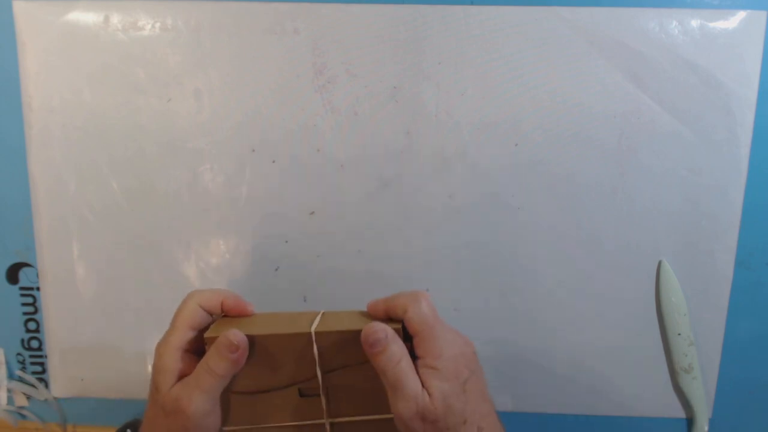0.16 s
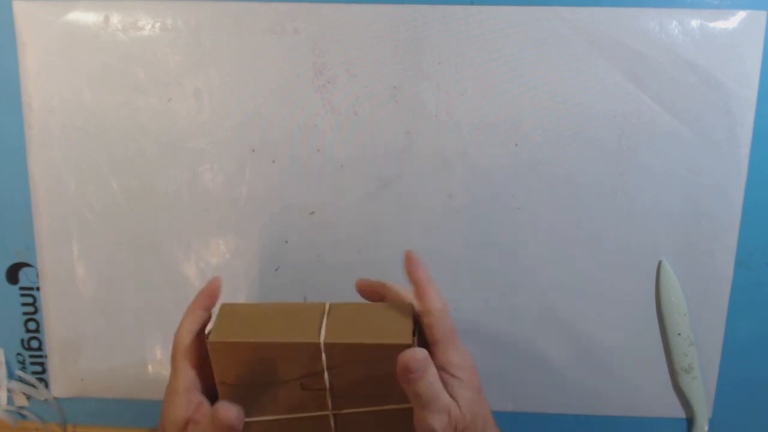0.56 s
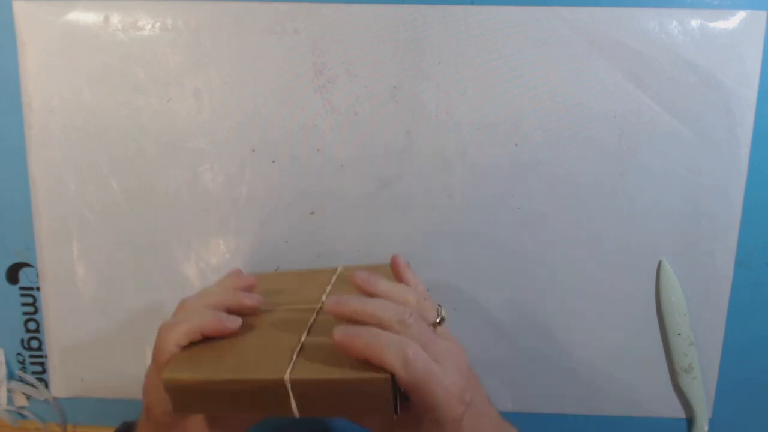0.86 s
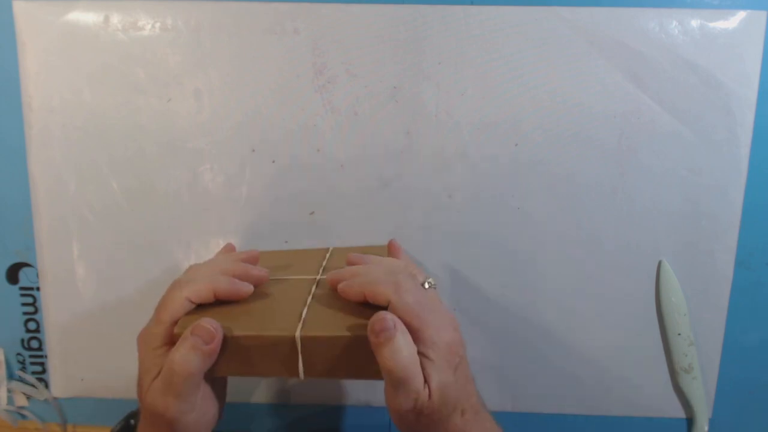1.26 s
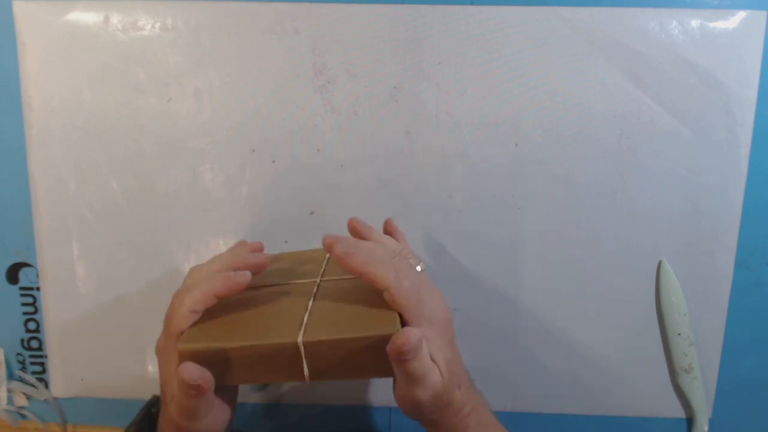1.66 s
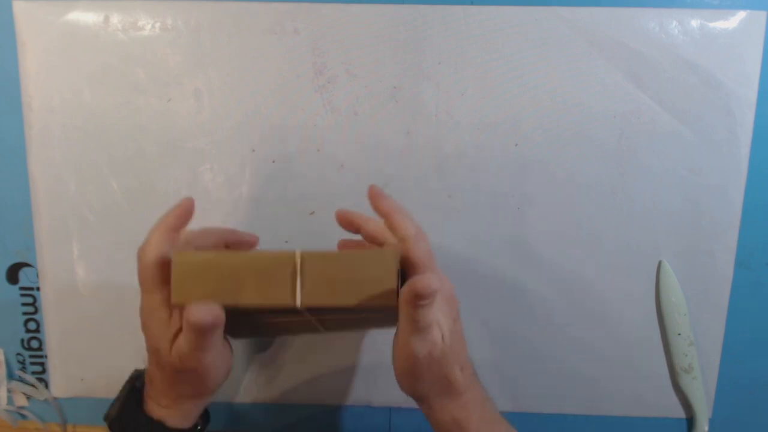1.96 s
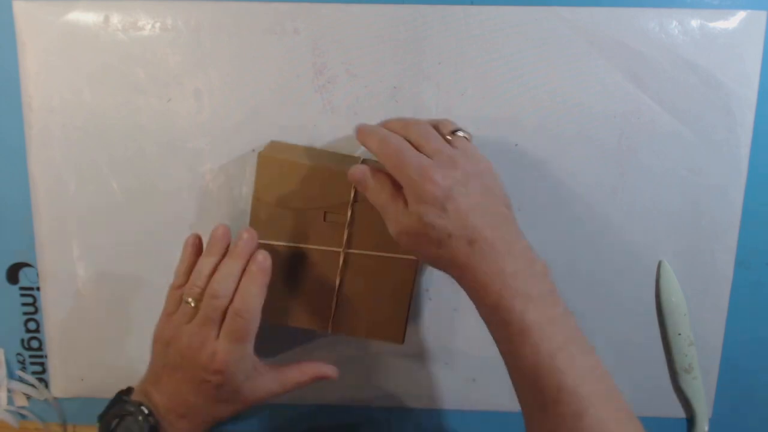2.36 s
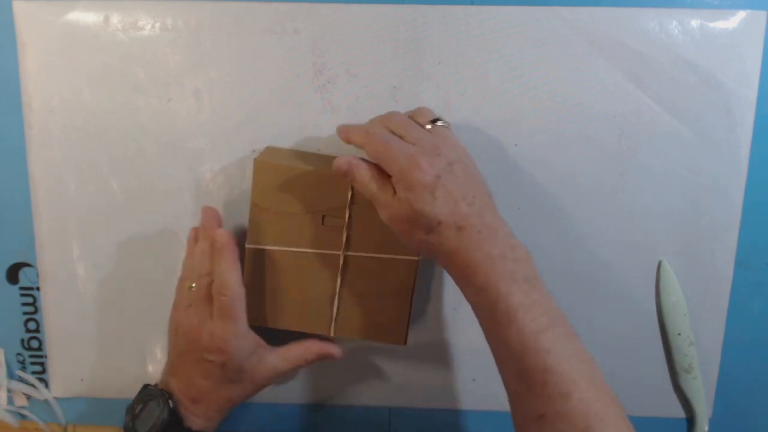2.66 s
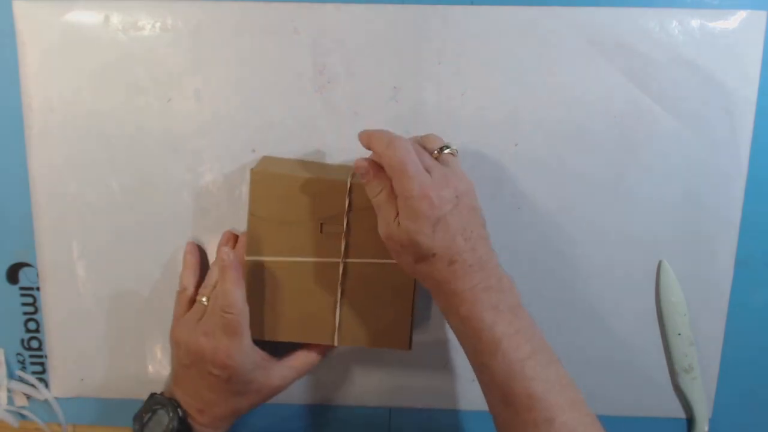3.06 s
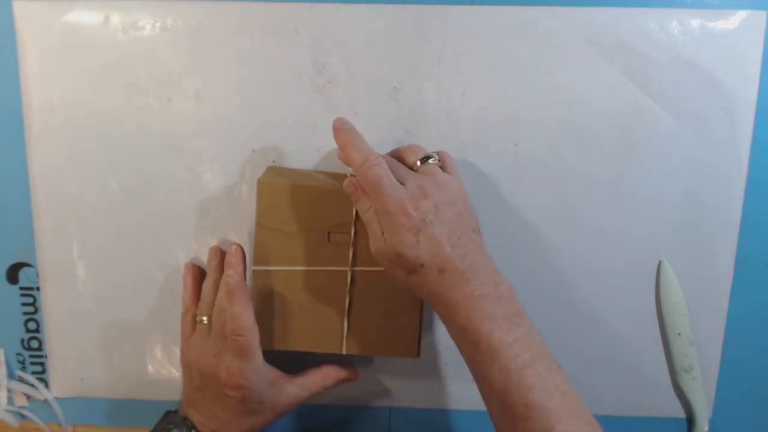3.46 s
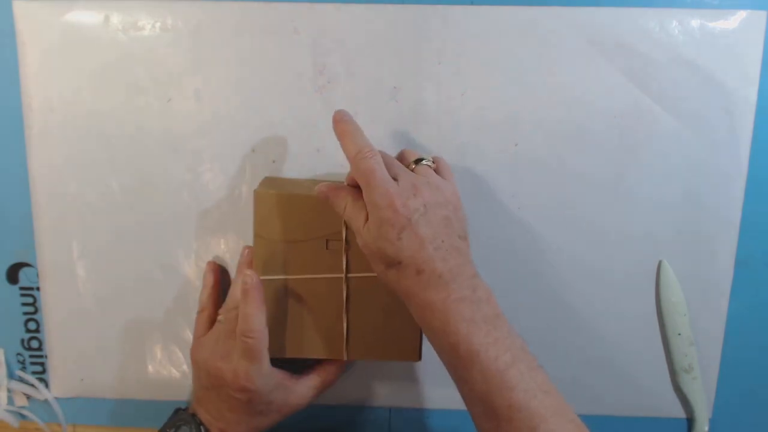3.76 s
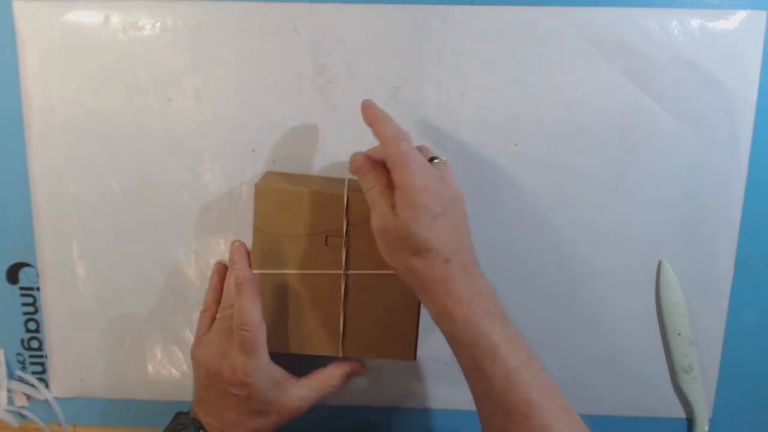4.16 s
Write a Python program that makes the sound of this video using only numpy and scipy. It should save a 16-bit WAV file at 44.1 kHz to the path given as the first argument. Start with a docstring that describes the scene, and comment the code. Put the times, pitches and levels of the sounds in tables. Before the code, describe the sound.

Fingers slide, click and tap on a small cardboard box as it is turned over. The box meets the table with a hollow knock, is rubbed some more, and lands again with a quick double knock. Then a stretched rubber band snaps against the lid four times, the first and last loudest, with cardboard clicks and scuffs between. The microphone is close in a small, dry room.

```python
"""A folded cardboard box is turned over, set down on a table and snapped with its rubber bands.
Flaps click, and fingers slide, rub and tap on the panels, making them hiss and hum.
The box lands with a few knocks; then a stretched band slaps the lid and sets it ringing.
The room is small and dry. A close microphone cuts the top treble and overloads on the hardest blows."""
import sys
import numpy as np
from scipy import signal
from scipy.fft import rfft, irfft, next_fast_len
from scipy.io import wavfile
from scipy.ndimage import uniform_filter1d, minimum_filter1d, map_coordinates

SR = 44100
rng = np.random.default_rng(int(sys.argv[2]) if len(sys.argv) > 2 else 0)


def unload_wav(signal):
    """Save mono or channel-first audio to the path in sys.argv[1] as 16-bit WAV at rate SR, clipped to [-1, 1]."""
    wavfile.write(
        sys.argv[1],
        SR,
        np.round(np.clip(np.atleast_2d(signal).T, -1, 1) * 32767).astype(np.int16),
    )


N = 190335
LENGTH, LEAD = 16384, 1024  # samples in one short sound, and in the scrape that leads into a blow
T = np.arange(LENGTH) / SR
HZ = np.fft.rfftfreq(LENGTH, 1 / SR)

# Flaps click. Each row: time in seconds, level in dB, tilt toward treble in dB per octave, thump in dB,
# pitch of the struck spot in Hz, build-up in seconds, ringing in dB.
FLAP_CLICKS = [(.057, -23, -0.5, -4, 2300, .0004, -9.5), (.077, -24, 3.5, -14.5, 7000, .0003, -24.5),
               (.699, -36, -4, -36, 3020, 0.00029, -1), (.81, -24.5, -4.5, -32, 3100, 0.001, -15.5),
               (.926, -40, 1.5, -40, 570, 0.00067, 2.5), (1.926, -23, 4.5, -35, 2570, 0.00066, -7),
               (2.084, -33.5, -2.5, 4, 1400, 0.0023, -25.5), (2.244, -24.5, -1, -49, 3740, 0.00026, -10.5),
               (2.806, -26.5, -5.5, -44, 1350, 0.0066, -22), (3.368, -25.5, 4.5, -18, 2040, 0.00022, -16),
               (3.376, -19.5, 0, -18, 694, 0.00063, -39), (3.559, -18, -5.5, -47, 2720, 0.00015, -2.5),
               (3.606, -27.5, -0.5, -21.5, 398, 0.001, -23), (3.78, -29.5, 1.5, -20.5, 620, 0.0019, -1.5),
               (3.923, -12.5, -1.5, -32.5, 620, 0.0013, -19), (4.003, -27, -1, -10.5, 1034, 0.0021, -7)]
# The box lands. Each row: as for a click, then chatter fade time in seconds, lead-in scrape in dB.
BOX_KNOCKS = [(1.142, -13, -1.5, -0.5, 490, 0.0013, -3, 0.064, -18),
              (2.072, -36, -6, 4.5, 560, 0.0045, -8, .04, -32),
              (2.321, -15, -1.2, -4, 840, 0.0018, -6.5, 0.11, -32.5),
              (2.331, -18, 2.5, -1.5, 1150, 0.0013, -8.5, 0.061, -26.5),
              (2.424, -39.5, -10.5, 4, 950, 0.0099, -21, 0.084, -2)]
# The band slaps the lid. Each row: as for a knock.
BAND_SNAPS = [(3.2, -8, -0.77, -6, 1314, 0.0012, -15, 0.028, -29.5),
              (3.438, -20.5, 1.46, -5.5, 512, .0003, -11, .018, -18.5),
              (3.825, -24, 2.9, -7, 1770, .0008, -10.5, 0.013, -27.5),
              (4.152, -7.5, 0.06, -0.5, 1404, 0.00079, -15.5, .027, -46)]
# Skin slides on card, and the rubber band fizzes briefly after two of its snaps.
# Each row: loudest moment in seconds, length in seconds, level in dB, brightness in dB.
SLIDE_STROKES = [(0.058, 0.16, -24.5, -1), (0.175, 0.16, -32, 8), (0.265, 0.074, -34.5, -3),
                 (0.377, 0.074, -21.5, 5), (.515, 0.14, -37.5, -3), (0.639, 0.042, -28, -10.5),
                 (0.712, 0.092, -40.5, -7), (0.815, 0.07, -31.5, -6.5), (1.291, 0.056, -34.5, -7.5),
                 (1.451, 0.046, -52, 3), (1.578, .08, -46, -10), (1.763, 0.09, -50, 25.5),
                 (1.813, 0.055, -32.5, 6), (1.869, 0.16, -44.5, -2), (1.952, 0.044, -50.5, 22.5),
                 (2.078, 0.055, -30, 2.5), (2.134, 0.17, -61, 18), (2.63, 0.16, -52, -14.5),
                 (2.917, 0.03, -30, -19), (3.005, 0.15, -30.5, -19), (3.305, 0.093, -35, 3),
                 (3.407, 0.073, -34.5, 6), (3.459, 0.073, -46, 32), (3.535, 0.064, -34, -1),
                 (3.618, 0.029, -26.5, 2), (3.784, 0.15, -36.5, -2.5), (3.86, 0.046, -58, 16.5),
                 (4.004, 0.046, -26.5, 6)]
# A finger drags and a panel hums. Each row: loudest moment in seconds, level in dB, pitch in Hz.
FINGER_RUBS = [(.436, -33, 585), (.6, -39.5, 554), (0.982, -41, 646), (1.292, -36, 370), (1.389, -48, 388),
               (1.568, -43.5, 898), (1.642, -44.5, 432), (1.737, -38, 383), (1.817, -28.5, 385),
               (1.943, -31, 839), (2.131, -38.5, 564), (2.67, -45, 452), (2.92, -42, 396),
               (3.026, -39.5, 730), (3.061, -45.5, 391), (3.351, -33.5, 728), (3.54, -34, 600),
               (3.758, -33, 743), (4.238, -33.5, 746), (4.295, -42.5, 393)]
# Fingertips drum on a panel. Each row: start in seconds, level in dB, pitch in Hz.
FINGER_TAPS = [(.556, -6.5, 585), (.626, -19.5, 633), (.636, -23.5, 599), (1.594, -26.5, 572),
               (2.695, -17.5, 610), (2.707, -24, 404), (2.805, -18, 741), (2.975, -23.5, 427),
               (3.311, -27, 497), (3.902, -27.5, 397), (3.955, -21, 566), (3.981, -22, 390)]

# Modes (natural ringing tones) of the lid and of the whole box on the table.
# Each row: pitch in Hz, level in dB, longest allowed fade time in seconds.
LID_MODES = [(368.2, -3.5, 0.33), (497, -12.5, 0.043), (759, 4, 0.076), (865, 3, 0.043), (1307, 2.5, 0.052),
             (1550, -12, 0.2), (1934, -8.5, 0.071), (2040, -5, 0.081), (2390, -5.5, 0.23),
             (3000, -3.5, 0.043), (3270, -7, 0.33), (3930, -14.5, 0.18), (4410, -4, 0.33), (5150, -5, 0.12)]
BOX_MODES = [(114, -11.5, 0.15), (138.2, -10.5, 0.27), (164.6, -1.5, 0.27), (185, -5.5, 0.17),
             (263, -5.5, 0.14), (400.4, 8, .1), (553, 1, 0.15), (650, -6, 0.058), (854, 0.5, 0.084),
             (1000, -18.5, 0.076), (1320, -7, 0.09), (1311, -5, 0.11), (1746, -10, .08)]
# Modes of a tapped panel. Each row: multiple of its pitch, level in dB.
PANEL_MODES = [(1, 7.5), (.72, -21), (1.18, -3), (1.7, -7.5)]
# The edges, in Hz, of the five frequency ranges of a blow. The lowest range is the thump.
RANGE_EDGES_HZ = [90, 300, 650, 1100, 3000, 8000]
# The tone of each kind of blow above its thump. Each row: frequency in Hz, level in dB.
CLICK_COLOUR = [(440, -4.5), (850, -1.5), (1800, 1.5), (4900, -2)]
KNOCK_COLOUR = [(440, 3.5), (850, -3.5), (1800, -5), (4900, -14)]
SNAP_COLOUR = [(440, 1), (850, -4.5), (1800, 0.5), (4900, -2)]
# How well the box passes sound to the air, with a dip between its air resonance and lowest panel mode.
# Each row: frequency in Hz, gain in dB.
BOX_RESPONSE = [(90, 2.5), (155, 2.5), (280, -1.5), (390, 1), (500, 2.5), (730, 3), (1000, 1), (1300, 3.5),
                (1950, 3), (2700, 4), (4500, -2), (6800, -7), (8000, -14.5)]
# The light band mostly wakes the lid's upper modes. Each row: frequency in Hz, gain in dB.
SLAP_BOOST = [(400, -6.5), (800, 3), (1250, 9.5), (4500, 11.5)]
# Three layers of sliding noise, a fingertip's tick and the room's hush.
# Each row: frequency in Hz, level in dB.
MURMUR_COLOUR = [(80, -25), (250, -15.5), (380, 1), (560, 8), (800, -4), (1300, -8.5), (2500, -20),
                 (5000, -49)]
RASP_COLOUR = [(400, -20), (900, 6), (1400, 6), (2600, 8.5), (3400, 1.5), (6000, -37)]
HISS_COLOUR = [(1200, -33.5), (2800, 0.5), (3600, 0.5), (5000, -1), (6500, -2.5), (8000, -16.5)]
TICK_COLOUR = [(150, -31), (700, -19.5), (1400, 9.5), (2800, 15), (7000, -9), (10000, -77)]
HUSH_COLOUR = [(25, -27.5), (100, 2), (250, 1), (500, -0.5), (1000, 0), (3000, -10.5), (8000, -15.5)]
# How long the room echoes. Each row: frequency in Hz, fade time in seconds.
ECHO_FADE = [(150, 0.15), (700, 0.14), (2000, 0.14), (7000, 0.15)]
# How loud the room echoes. Each row: frequency in Hz, level in dB.
ECHO_LEVEL = [(100, -25.5), (350, -16.5), (700, -10), (2000, -10), (7000, -13.5)]
# How much the table's reflections differ from left to right. Each row: frequency in Hz, gain in dB.
STEREO_SPREAD = [(130, 12), (500, 9), (1200, 4), (3000, 0)]


def amp(db):
    """Turn decibels into a gain."""
    return 10 ** (np.asarray(db) / 20)


def unit(x):
    """Scale to an average power of 1."""
    return x / np.sqrt(np.mean(x ** 2) + 1e-20)


def norm(x):
    """Scale to a total energy of 1."""
    return x / np.linalg.norm(x)


def fade(t, t60):
    """Die away by 60 dB in t60 seconds, the fade time."""
    return np.exp(-np.log(1000) * t / np.maximum(t60, 1e-3))


def along(points, hz):
    """Read between the rows of a frequency table, on a scale of octaves."""
    freqs, values = np.transpose(points)
    return np.interp(np.log(hz + 1), np.log(freqs + 1), values)


def wobble(rate):
    """A smooth curve through `rate` random values a second."""
    return map_coordinates(rng.standard_normal(int(N * rate / SR) + 4), [np.arange(N) * rate / SR])


def filtered(x, response):
    """Give each frequency of x the gain that `response` returns."""
    size = next_fast_len(N + 8192)
    return irfft(rfft(x, size) * response(np.fft.rfftfreq(size, 1 / SR)), size)[..., :N]


def coloured(x, colour):
    """Shape noise with a colour table, at an average power of 1."""
    return unit(filtered(x, lambda hz: amp(along(colour, hz))))


def causal(points):
    """Turn a table of Hz and dB into a filter that never rings before it is hit (minimum phase)."""
    cepstrum = irfft(np.log(np.maximum(amp(along(points, HZ)), 1e-6)))
    cepstrum[1:LENGTH // 2] *= 2
    cepstrum[LENGTH // 2 + 1:] = 0
    return np.exp(rfft(cepstrum))


def add(track, s, sound):
    """Mix a sound in at s seconds."""
    part = track[round(s * SR):][:len(sound)]
    part += sound[:len(part)]


def swell(s, rise, fall):
    """A loudness curve that peaks at s and is 20 dB down `rise` seconds before and `fall` after."""
    t = np.arange(N) / SR - s
    width = np.where(t < 0, rise, fall)
    return 10 ** -np.minimum(abs(t / width) ** 1.236, 20)


def in_room(sound, delay_s=.004):
    """Add the room's short echo, slightly different for every hit."""
    hz, t, noise = signal.stft(rng.standard_normal(LENGTH), SR, nperseg=256)
    dying = noise * fade(t, along(ECHO_FADE, hz)[:, None])
    tail = norm(signal.istft(dying, SR, nperseg=256)[1])
    echo = irfft(rfft(sound) * rfft(tail[:LENGTH]) * causal(ECHO_LEVEL))
    return sound + np.pad(echo, (round(delay_s * SR), 0))[:LENGTH]


def ringing(modes, t, drift=0.0065, crowd_t60=.16):
    """Card rings only briefly: its low modes waver, and its high ones crowd into a dry rasp."""
    tones = np.zeros(LENGTH)
    for hz, db, t60 in modes:
        gain = amp(db + rng.normal(0, 4.2))
        longest = min(.22, .16 * (1000 / hz) ** .2)
        phase = 2 * np.pi * hz * t + np.cumsum(rng.normal(0, drift, LENGTH))
        tones += gain * fade(t, min(t60, longest)) * np.sin(phase)
    treble = signal.butter(2, 1500, "high", fs=SR, output="sos")
    crowd = signal.sosfilt(treble, rng.standard_normal(LENGTH)) * fade(t, crowd_t60)
    onset = 1 - fade(t, 0.0088)
    return norm(norm(tones * onset) + norm(crowd * onset))


def blow(modes, build_s, chatter_t60, scrape_db, ring_db, push_db, bass_hz):
    """The spectrum of one hit: a scrape builds to a push and a burst of chatter, and the card rings on."""
    t = T - LEAD / SR
    after, before = np.maximum(t, 0), np.maximum(-t, 0)
    chatter = fade(after, chatter_t60) * np.exp(-before / build_s)
    scrape = (t < 0) * amp(scrape_db) * fade(before, 0.025)
    contact = norm(rng.standard_normal(LENGTH) * (chatter + scrape))
    push = (t >= 0) * np.exp(-after / 0.00027)  # card gives way, so the push is a short bump
    contact += amp(push_db) * push / push.sum()
    spectrum = rfft(contact + amp(ring_db) * ringing(modes, after))
    # small panels give off little bass
    bass_cut = (1j * HZ) ** 2 / (bass_hz ** 2 - HZ ** 2 + np.sqrt(2) * 1j * HZ * bass_hz)
    return spectrum * bass_cut * causal(BOX_RESPONSE)


def at_spot(sound, hz, boost_db=5, sharpness=5.1):
    """The stiffness of the card where it is struck lifts one pitch; the energy stays the same."""
    peak = signal.lfilter(*signal.iirpeak(hz, sharpness, fs=SR), sound)
    return norm(sound + amp(boost_db) * peak) * np.linalg.norm(sound)


def blows(table, colour, modes, gain_db, ringing_db, push_db, bass_hz):
    """Play a table of hits, each with its own loudness, brightness, thump and ring."""
    track = np.zeros(N)
    edges = np.array(RANGE_EDGES_HZ)
    centres = np.sqrt(edges[1:] * edges[:-1])
    ranges = [(HZ >= low) & (HZ < high) for low, high in zip(edges, edges[1:])]
    for s, db, tilt, thump_db, spot_hz, build_s, ring_db, chatter_t60, scrape_db in table:
        spectrum = blow(modes, build_s, chatter_t60, scrape_db, ring_db + ringing_db, push_db, bass_hz)
        # steer each frequency range toward its wanted level
        upper_db = along(colour, centres[1:]) + tilt * np.log2(centres[1:] / 1000)
        wanted_db = gain_db + db + np.r_[thump_db, upper_db]
        energy = np.array([np.sum(abs(spectrum[part]) ** 2) for part in ranges]) * 2 / LENGTH
        sound = irfft(spectrum * causal(np.c_[centres, wanted_db - 10 * np.log10(energy)]))
        add(track, s - LEAD / SR, in_room(at_spot(sound, spot_hz)))
    return track


def flap_clicks(chatter_t60=0.025, scrape_db=-19.5):
    """Flaps and edges catch and let go, making the lid ring."""
    rows = [(*row, chatter_t60, scrape_db) for row in FLAP_CLICKS]
    return blows(rows, CLICK_COLOUR, LID_MODES, gain_db=22.5, ringing_db=-7.5, push_db=-2, bass_hz=270)


def strokes(bright_share, grip_db=-73, restless_db=4, rise_share=.34):
    """Loudness of one sliding layer: it swells with each stroke, over a faint, shifting grip."""
    grip = amp(grip_db - 5 * bright_share + restless_db * wobble(25))
    return grip + sum(
        amp(db + bright_share * bright_db) * swell(s, rise_share * length, (1 - rise_share) * length)
        for s, length, db, bright_db in SLIDE_STROKES)


def through_lid(x, boost_db=3, sharpness=30):
    """The lid's modes stand out of whatever rubs on it."""
    def response(f):
        peaks = 0
        for hz, db, _ in LID_MODES:
            damping = 1j * f * hz / sharpness
            peaks += amp(db) * damping / (hz ** 2 - f ** 2 + damping)
        return 1 + amp(boost_db) * peaks
    return filtered(x, response)


def slides(murmur_db=-3, rasp_db=-8.5, hiss_db=-16, grain_db=3, slip_db=2):
    """Skin or rubber sticks and slips on the paper: a fine hiss and rasp, and a murmur in the panels."""
    murmur = amp(murmur_db) * strokes(bright_share=0)
    rasp = amp(rasp_db) * strokes(bright_share=.65)
    hiss = amp(hiss_db) * strokes(bright_share=1)
    slips = amp(slip_db * wobble(120))

    def friction(colour):
        grainy = rng.standard_normal(N) * slips * amp(grain_db * wobble(1200))
        return coloured(through_lid(grainy), colour)
    return murmur * friction(MURMUR_COLOUR) + rasp * friction(RASP_COLOUR) + hiss * friction(HISS_COLOUR)


def finger_rubs(rise_s=0.026, fall_s=0.039, width_hz=170, gain_db=-1):
    """Uneven slipping keeps one panel mode going for a moment: a hollow, rough hum."""
    t = np.arange(N) / SR
    real, imaginary = (unit(wobble(width_hz) + .5 * wobble(3 * width_hz)) for _ in range(2))
    slipping = real + 1j * imaginary  # shakes both loudness and pitch
    track = np.zeros(N)
    for s, db, hz in FINGER_RUBS:
        hum = np.real(slipping * np.exp(2j * np.pi * hz * t))
        track += amp(gain_db + db) * swell(s, rise_s, fall_s) * hum
    return track


def finger_taps(t60=0.048, attack_s=0.0026, panel_db=-1, tick_t60=0.031, drift=.012):
    """A soft fingertip ticks on a panel, which rings briefly at a pitch that depends on the grip."""
    track = np.zeros(N)
    skin = causal(TICK_COLOUR)
    for s, db, pitch in FINGER_TAPS:
        panel = np.zeros(LENGTH)
        for ratio, mode_db in PANEL_MODES:
            waver = np.cumsum(rng.normal(0, drift, LENGTH))
            panel += amp(mode_db) * np.sin(2 * np.pi * pitch * ratio * T + waver)
        panel *= fade(T, t60) * (1 - np.exp(-T / attack_s))
        burst = rng.standard_normal(LENGTH) * fade(T, tick_t60)
        tick = norm(irfft(rfft(burst) * skin))
        tap = amp(panel_db) * panel / abs(panel).max() + tick
        add(track, s, in_room(amp(db) * tap))
    return track


def box_knocks():
    """The box lands on the table and rings as a whole."""
    return blows(BOX_KNOCKS, KNOCK_COLOUR, BOX_MODES, gain_db=26, ringing_db=-7, push_db=-6, bass_hz=143)


def air_puff(s=3.199, db=-12, hz=42, t60=0.037):
    """The first snap squeezes air out of the box onto the microphone, mostly on the left."""
    track = np.zeros(N)
    add(track, s, amp(db) * np.sin(2 * np.pi * hz * T) * fade(T, t60))
    return np.outer([1, .2], track)


def band_snaps():
    """A stretched rubber band slaps the lid and wakes mostly its upper modes."""
    modes = [(hz, db + along(SLAP_BOOST, hz), t60) for hz, db, t60 in LID_MODES]
    return blows(BAND_SNAPS, SNAP_COLOUR, modes, gain_db=28.5, ringing_db=-1.5, push_db=1, bass_hz=149)


def table_reflections(box, snaps, t60=0.013):
    """Sound off the table reaches left and right a little differently, most of all for the snaps."""
    scatter = norm(rng.standard_normal(LENGTH) * fade(T, t60))
    reflected = signal.fftconvolve(amp(-28.5) * box + amp(-30) * snaps, scatter)[:N]
    return filtered(reflected, lambda hz: amp(along(STEREO_SPREAD, hz)))


def suppress(x, threshold_db=-52, slope=0.24, depth_db=7):
    """A noise suppressor turns down whatever stays under its threshold."""
    power = uniform_filter1d(x.mean(0) ** 2, size=900)
    level_db = 10 * np.log10(abs(power) + 1e-12)
    gain_db = np.clip(slope * (level_db - threshold_db), -depth_db, 0)
    return x * amp(uniform_filter1d(gain_db, size=400))


def scene(low_cut_hz=110):
    """The box is handled straight ahead of the microphone, over a faint room hush."""
    snaps = band_snaps()
    box = snaps + box_knocks() + flap_clicks() + finger_taps() + slides() + finger_rubs()
    # the microphone loses the deepest bass
    box = signal.sosfilt(signal.butter(2, low_cut_hz, "high", fs=SR, output="sos"), box)
    hush = amp(-63) * coloured(rng.standard_normal(N), HUSH_COLOUR)
    side = table_reflections(box, snaps)
    return np.array([box + side, box - side]) + hush + air_puff()


def record(dry, top_hz=7650, limit=1.1):
    """The microphone hushes the pauses, cuts the top treble, holds down peaks and clips what is left."""
    x = filtered(suppress(dry), lambda hz: 1 / np.sqrt(1 + (hz / top_hz) ** 76))
    needed_gain = np.minimum(1, limit / (abs(x).max(0) + 1e-9))
    smooth_gain = uniform_filter1d(minimum_filter1d(needed_gain, size=41), size=41)
    clipped = np.clip(x * smooth_gain, -.98, .98)
    return filtered(clipped, lambda hz: hz < 16400)


dry = scene()
out = record(dry)
unload_wav(out)
```